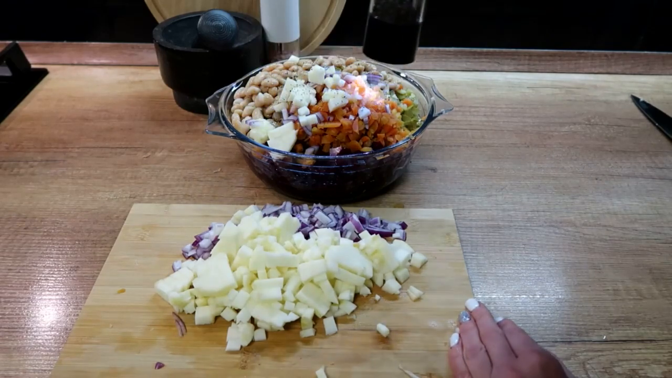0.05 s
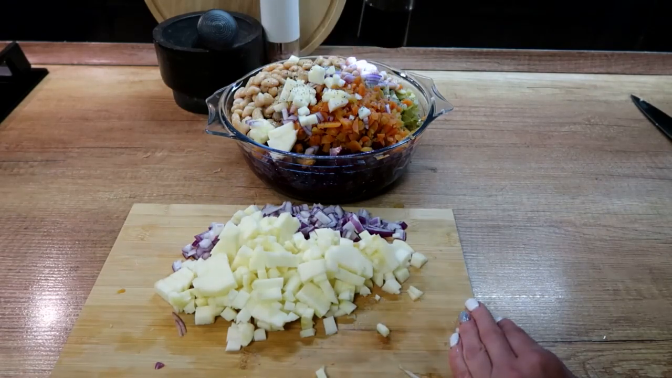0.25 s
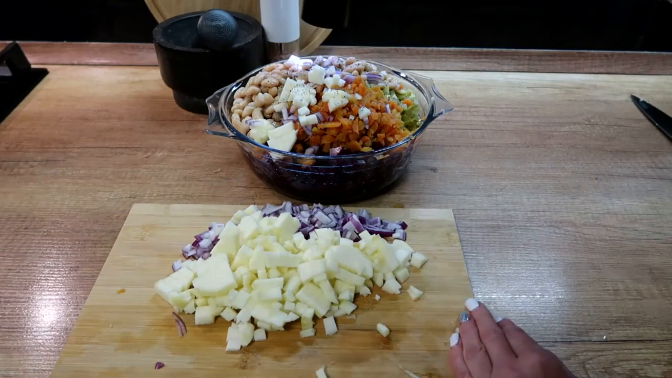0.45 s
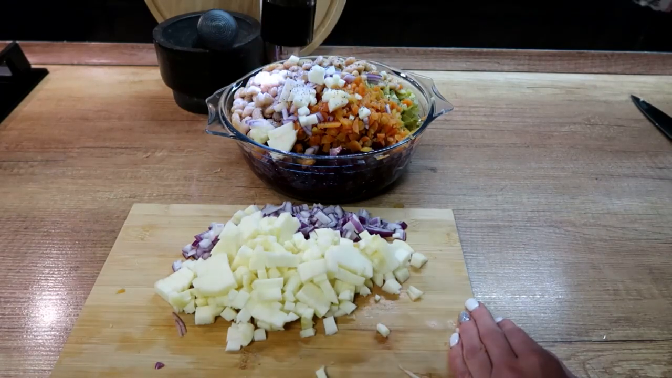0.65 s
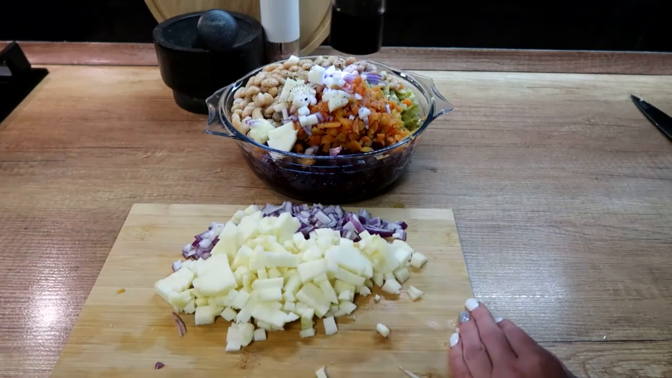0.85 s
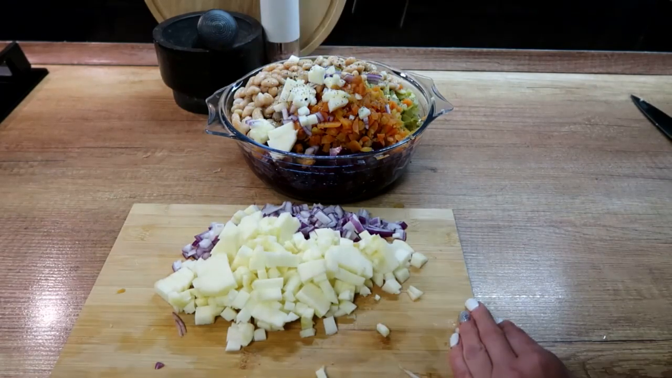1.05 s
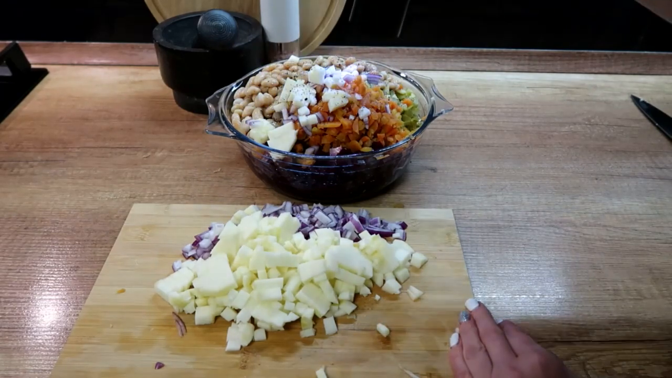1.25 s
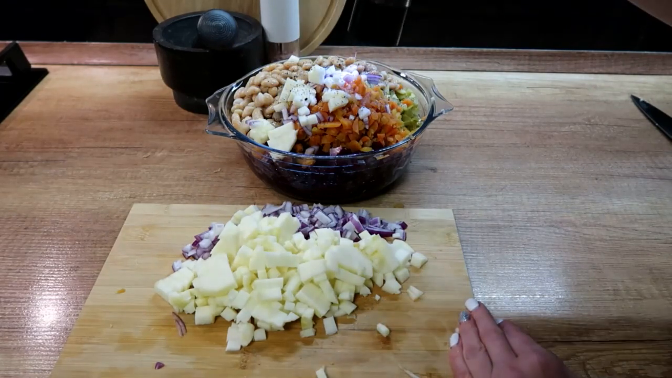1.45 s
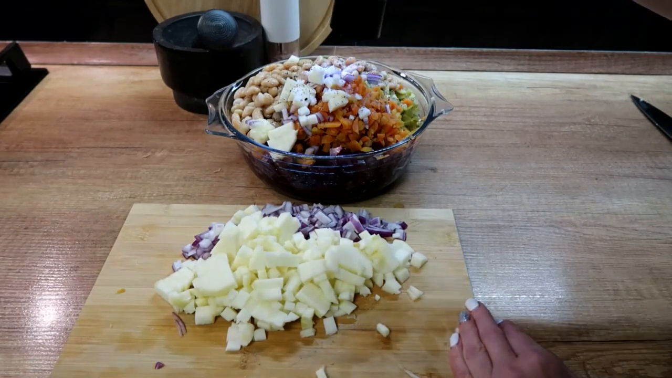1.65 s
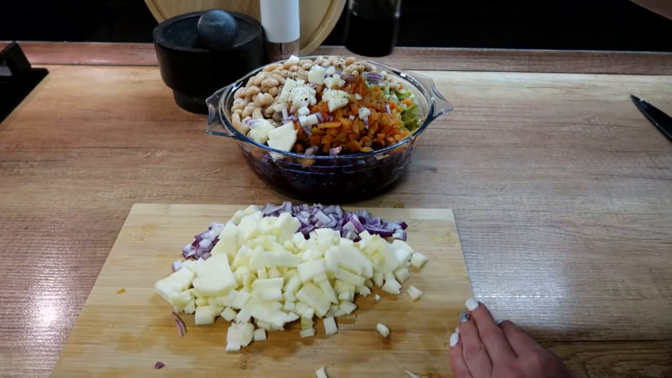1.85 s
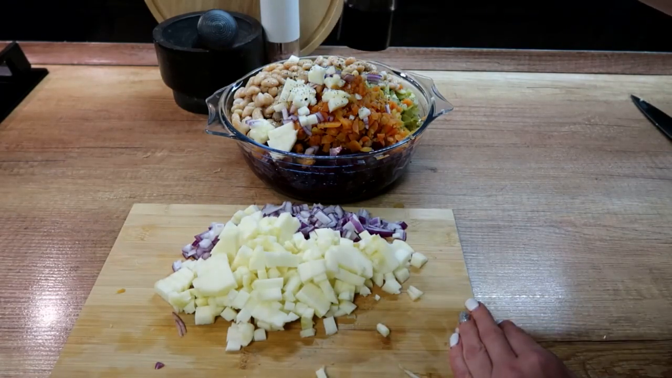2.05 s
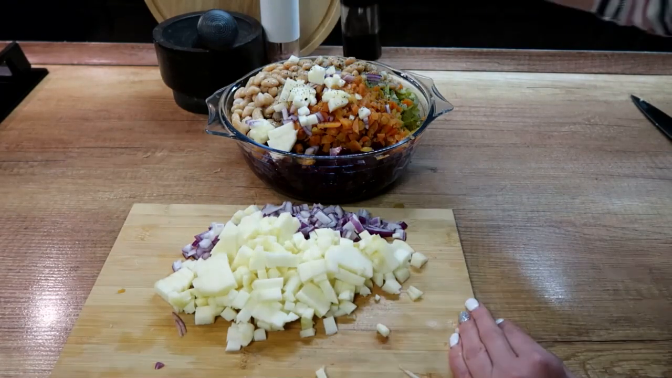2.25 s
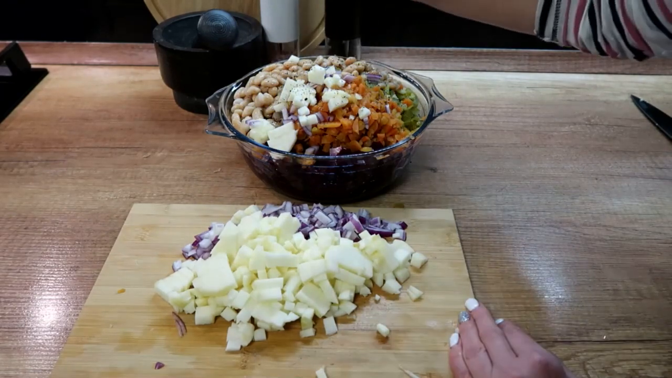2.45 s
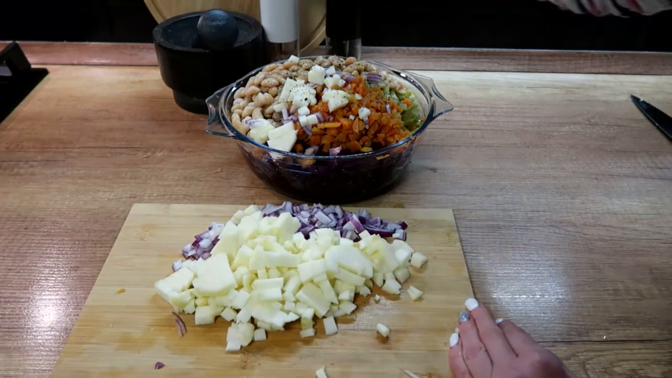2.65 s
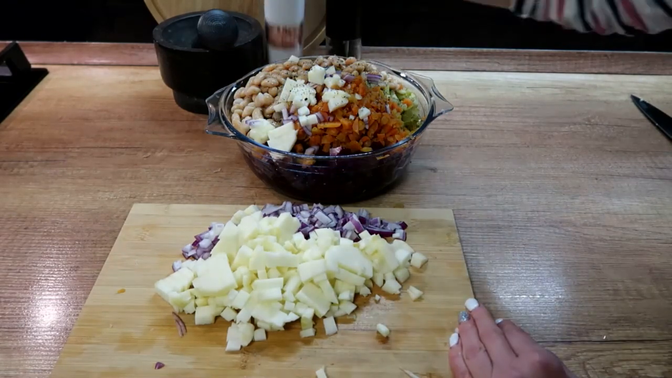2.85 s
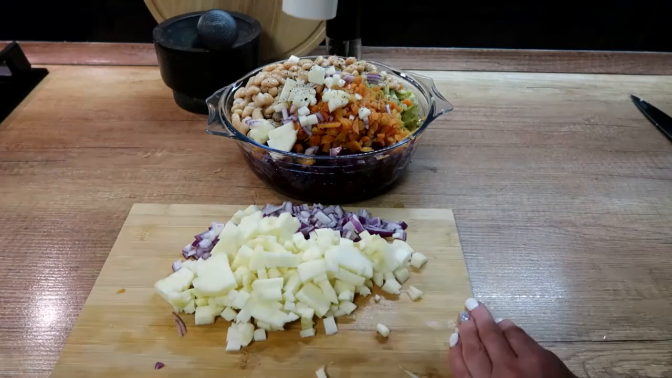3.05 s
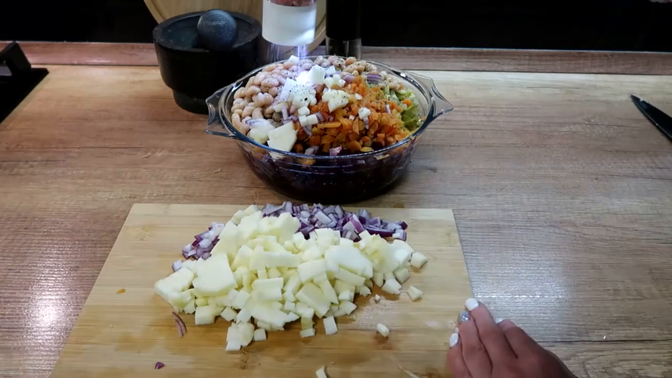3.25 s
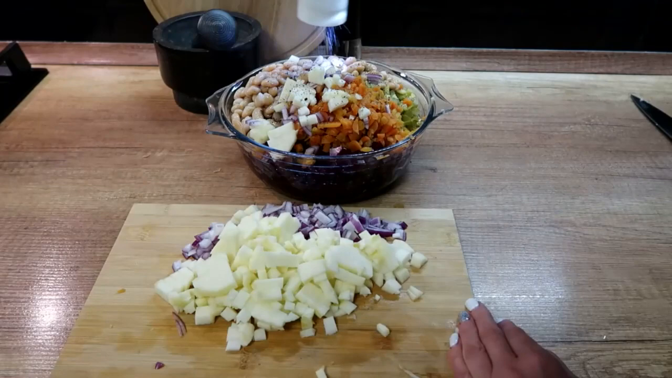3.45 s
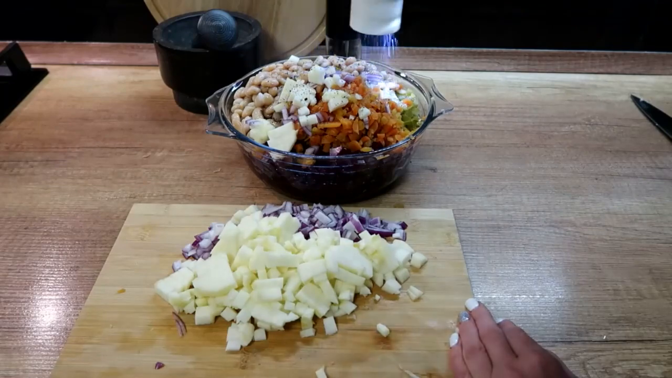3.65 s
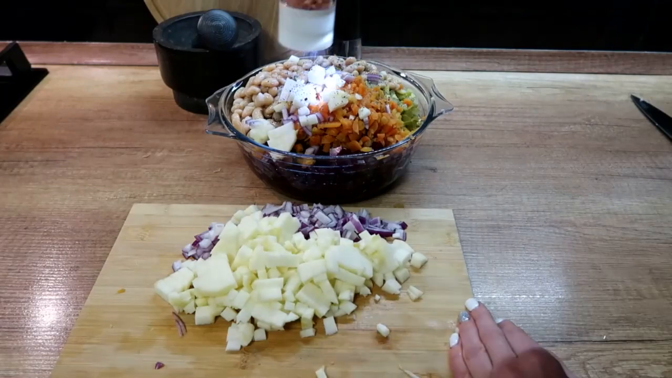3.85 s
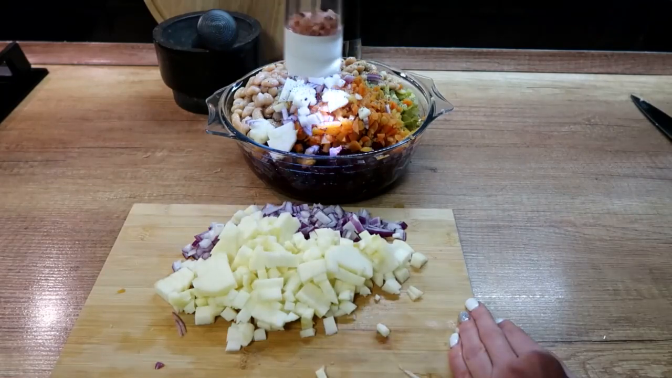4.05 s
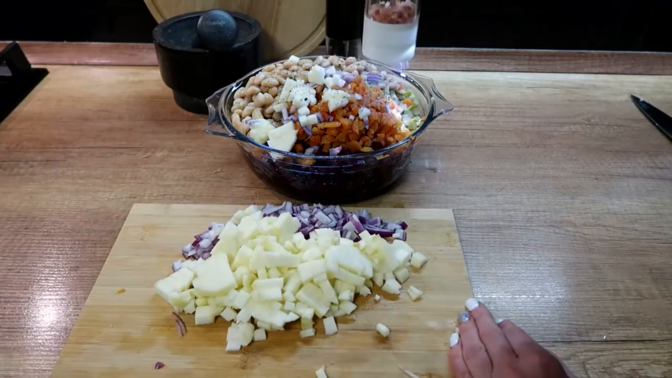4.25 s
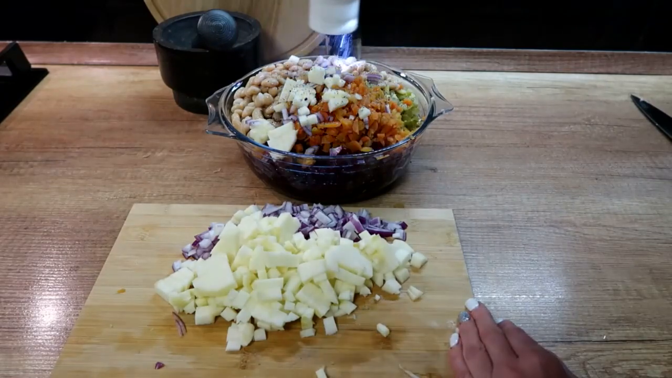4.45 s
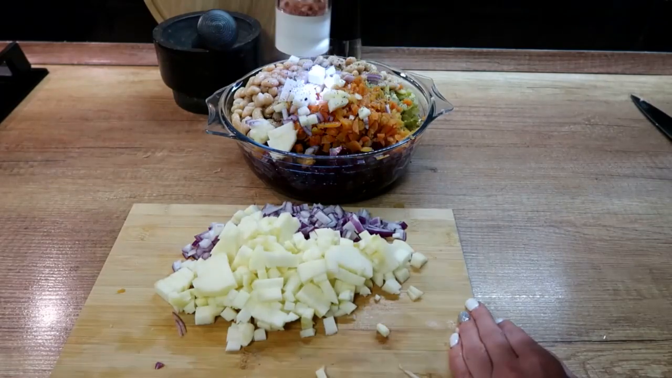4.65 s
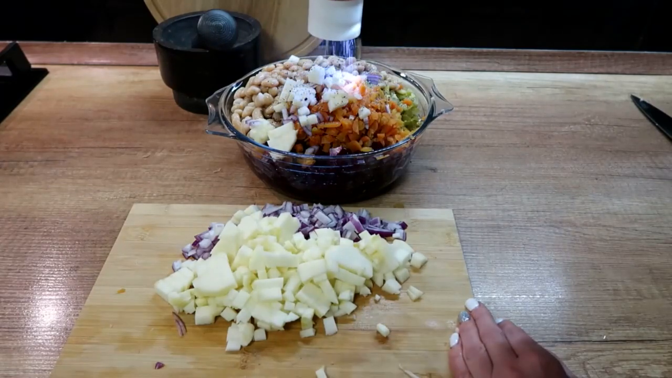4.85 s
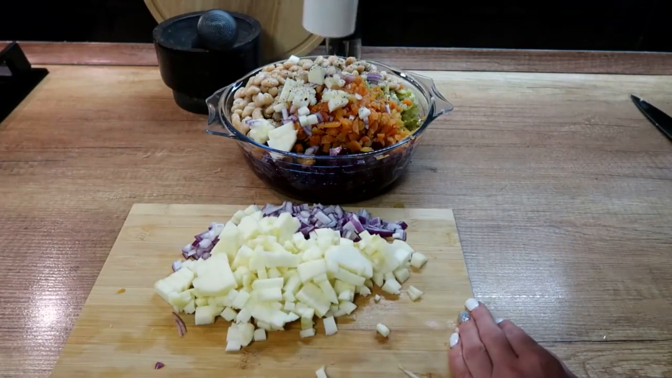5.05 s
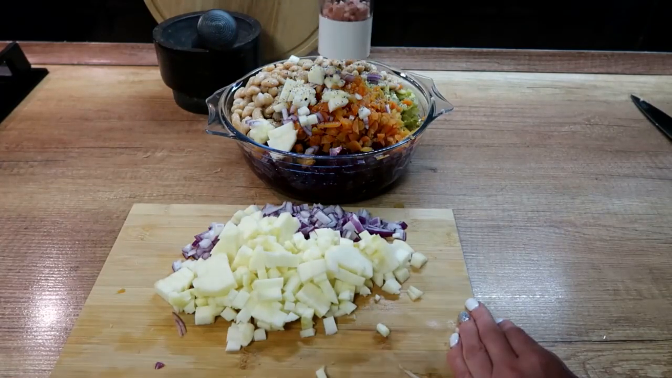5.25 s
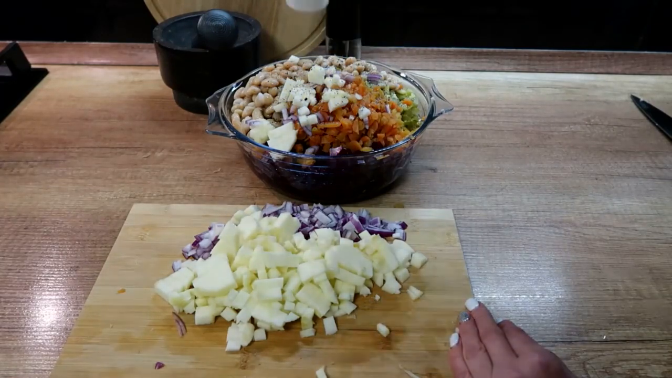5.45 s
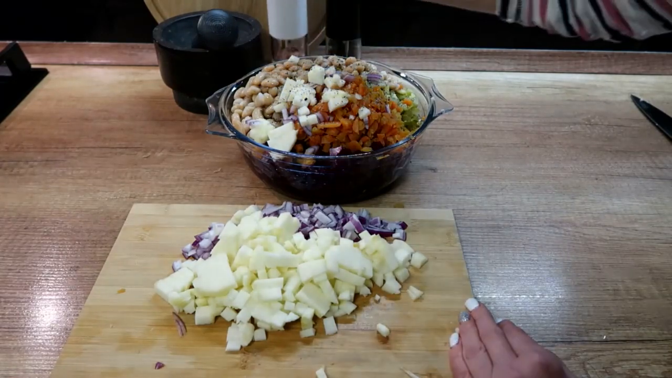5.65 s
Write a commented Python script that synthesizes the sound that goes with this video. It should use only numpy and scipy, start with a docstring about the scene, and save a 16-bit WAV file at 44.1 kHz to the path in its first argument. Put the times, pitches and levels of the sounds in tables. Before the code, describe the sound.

Close in a quiet kitchen, a motorised pepper mill is already running: bright gritty rasp, a wavering gear whine that sags and squeals, a few cracks. It cuts off abruptly, something bumps the counter with light plastic taps, and after a short quiet a salt mill spins up, coarser and duller, crackling densely until the end. Close stereo microphone, little reverberation.

```python
"""Pepper mill, then salt mill

Two battery mills are held in turn over a bowl on a kitchen counter: first pepper, then coarse salt.
As the burrs bite a grain the motor slows: the rough gear whine sags and squeals and the rasp mostly swells,
until the grain gives way and the motor picks up again. Filtered noise bursts crack over both mills.
In the pause something is put down with a dull bump: ringing counter modes, noise clatter and light taps.
"""
import sys
import numpy as np
from scipy import signal
from scipy.fft import rfft, irfft
from scipy.io import wavfile
from scipy.ndimage import uniform_filter1d, map_coordinates

SR = 44100
rng = np.random.default_rng(int(sys.argv[2]) if len(sys.argv) > 2 else 0)


def file_out(sig):
    """Save sig as 16-bit WAV at sys.argv[1]."""
    # one column per channel
    cols = np.atleast_2d(sig).T
    # limit, then scale
    lim = np.clip(cols, -1, 1)
    pcm = np.round(lim * 32767).astype(np.int16)
    wavfile.write(sys.argv[1], SR, pcm)


N = 251502   # length in samples


def from_db(db):
    """Decibels to gain."""
    return 10 ** (np.asarray(db) / 20)


def rms_one(x):
    """Scale to rms 1."""
    return x / np.sqrt(np.mean(x ** 2) + 1e-20)


def clock():
    """Time of every sample in seconds."""
    return np.arange(N) / SR


def drift(rate):
    """Smooth random wander of rms 1 that changes about rate times a second."""
    r = np.exp(-2 * np.pi * rate / SR)
    noise = rng.standard_normal(N + SR)
    return rms_one(signal.lfilter([1], [1, -2 * r, r * r], noise)[SR:])   # the first second settles


def colour(x, spectrum, unit_power=True, size=4096):
    """Causal (minimum-phase) filter that follows a table of f/Hz, level/dB."""
    hz, db = np.transpose(spectrum)
    bins_hz = np.fft.rfftfreq(size, 1 / SR)
    gain = from_db(np.interp(np.log(bins_hz + 1), np.log(hz), db))
    # folding the cepstrum forward gives minimum phase
    cepstrum = irfft(np.log(rms_one(gain) if unit_power else gain))
    cepstrum[1:size // 2] *= 2
    cepstrum[size // 2 + 1:] = 0
    response = irfft(np.exp(rfft(cepstrum)))[:size // 2]
    return signal.oaconvolve(x, response)[:N]


def resonate(x, modes):
    """Parallel resonances from a table of f/Hz, width/Hz, level/dB."""
    out = 0
    for hz, width, db in modes:
        r = np.exp(-np.pi * width / SR)
        poles = [1, -2 * r * np.cos(2 * np.pi * hz / SR), r * r]
        out = out + from_db(db) * signal.lfilter([1, 0, -1], poles, x) * (1 - r * r) / 2
    return out


def ring(clicks, hz, t60):
    """A unit click sets off a decaying sine of starting height 1."""
    r = np.exp(-np.log(1000) / (t60 * SR))
    w = 2 * np.pi * hz / SR
    return signal.lfilter([0, np.sin(w)], [1, -2 * r * np.cos(w), r * r], clicks + 1e-18)


def blows(times, db):
    """Single clicks at given times and levels."""
    out = np.zeros(N)
    samples = np.round(np.asarray(times) * SR).astype(int)
    out[np.clip(samples, 0, N - 1)] = from_db(db)
    return out


def fade(clicks, decay_s):
    """Every click starts an envelope that dies away."""
    return signal.lfilter([1], [1, -np.exp(-1 / (decay_s * SR))], clicks + 1e-18)


def even(x, size=2048):
    """Hold the short-term level at 1."""
    return x / np.sqrt(np.abs(uniform_filter1d(x ** 2, size)) + 1e-12)


# spectrum of the room air: f/Hz, level/dB (per Hz, relative)
AIR_SPECTRUM = [(25, -38.5), (60, -12.5), (130, -9.5), (300, -7), (600, -15.5), (2000, -28), (5500, -35.5),
                (10000, -44.5), (15000, -56)]
# steady hum of kitchen appliances: f/Hz, level/dB
APPLIANCE_HUM = [(140, -77), (274.5, -97.5), (13010, -92.5)]
AIR_DB = -62


def background():
    """Room air is coloured noise in mid and side; appliance hum is sines that waver in strength."""
    mid, side = (colour(noise, AIR_SPECTRUM) for noise in rng.standard_normal((2, N)))
    hum = 0
    for hz, db in APPLIANCE_HUM:
        tone = np.sqrt(2) * np.sin(2 * np.pi * hz * clock())
        hum = hum + from_db(db) * tone * (1 + 0.34 * drift(5.0))
    return hum + from_db(AIR_DB) * (mid + from_db(-5) * side * np.array([[1], [-1]]))


def grit(per_s, spread_db, crumble_s):
    """Tiny fractures of uneven size, each a very short noise burst."""
    sizes = from_db(spread_db * np.minimum(rng.exponential(1, N), 4))
    born = rng.random(N) < per_s / SR
    energy = fade(born * sizes ** 2, crumble_s)
    return rms_one(np.sqrt(energy) * rng.standard_normal(N))


def turning(x, mesh_hz, count=16):
    """The rattle partly repeats with every turn of a pinion of count teeth: faint lines follow the motor."""
    likeness = .42
    turn = count * SR / mesh_hz   # samples
    repeats = 0
    for k in range(1, 3):
        repeats = repeats + likeness ** k * map_coordinates(x, [np.arange(N) - k * turn], order=3)
    return x + repeats


def rough_tone(hz, jitter, flutter):
    """A tone that wanders in pitch and flutters in strength, both as fractions."""
    phase = 2 * np.pi * np.cumsum(hz * (1 + jitter * drift(118.0))) / SR
    return (1 + flutter * drift(92)) * np.sin(phase)


def whine(mesh_hz, partials, jitter, flutter):
    """Loose plastic gears: each partial wavers on its own."""
    return sum(from_db(db) * rough_tone(multiple * mesh_hz, jitter, flutter) for multiple, db in partials)


GRIP_S, LET_GO_S = 0.013, 0.019   # a bite takes hold and lets go
SLACK_DB, SLACK_S = 2, 0.12   # the burrs run empty for a moment after a grain has given way


def motor(bites, free_hz, idle_whine_db, idle_rasp_db, recover_s, size=32):
    """Bites drag the motor down until grains give: mesh f/Hz, gains of whine and two overtones, rasp dB."""
    t = clock()[::size]
    sag, rise_db, second, third, gears = 0, 0, 0, 0, from_db(idle_whine_db)
    for caught, freed, slowest_hz, bend, whine_db, second_db, third_db, rasp_db in bites:
        progress = np.clip((t - caught) / (freed - caught), 0, 1)
        after = np.maximum(t - freed, 0)
        slowing = (1 - slowest_hz / free_hz) * (1 - (1 - progress) ** bend)
        sag = np.maximum(sag, slowing * np.exp(-after / recover_s))
        grip = np.clip((t - caught) / GRIP_S, 0, 1) * np.exp(-after / LET_GO_S)
        slack = np.exp(-after / SLACK_S) - np.exp(-after / LET_GO_S)
        gears = np.maximum(gears, from_db(whine_db) * grip)
        strain = grip * np.sqrt(progress)   # the overtones grow as the bite tightens
        second = second + from_db(second_db) * strain
        third = third + from_db(third_db) * strain
        rise_db = rise_db + rasp_db * grip - SLACK_DB * slack
    controls = (free_hz * (1 - sag), gears, second, third, idle_rasp_db + rise_db)
    return [np.interp(clock(), t, control) for control in controls]


# scrape of pepper husks on the burr: t/s, centre f/Hz, level/dB
HUSK_SCRAPE = [(.15, 4500, -54), (0.311, 4333, -39.5), (.48, 4230, -43.5), (.58, 3870, -46),
               (.72, 4140, -43), (0.881, 4100, -39.5), (1.031, 3900, -41.5), (1.11, 3400, -44),
               (1.22, 3206, -47), (1.3, 3740, -40.5), (1.37, 3600, -40), (1.48, 3266, -46),
               (1.58, 4000, -44), (1.689, 4145, -44), (1.8, 4250, -48), (1.95, 4140, -45),
               (2.3, 4355, -46.5)]
SCRAPE_WIDTH_HZ = 440


def scrape():
    """Husks dragged round the burr: a narrow band of hiss whose centre and level glide."""
    s, *columns = np.transpose(HUSK_SCRAPE)
    hz, db = (np.interp(clock(), s, column) for column in columns)
    lowpass = signal.butter(2, SCRAPE_WIDTH_HZ / 2, fs=SR, output="sos")
    a, b = signal.sosfilt(lowpass, rng.standard_normal((2, N)))
    phase = 2 * np.pi * np.cumsum(hz) / SR
    return from_db(db) * even(a * np.cos(phase) + b * np.sin(phase))   # noise moved up to the centre


# the burrs bite a peppercorn: caught t/s, gives way t/s, slowest gear mesh f/Hz, bend [no unit],
# whine level/dB, second harmonic level/dB, third harmonic level/dB, change of rasp level/dB
# bend 1 is a steady slowing; more is a grain that yields softly
PEPPERCORN_BITES = [(-.06, .03, 1791, 3, -37, -41.5, -42, 2), (.065, .12, 1690, .9, -36.5, -36, -47, 2),
                    (.27, .4, 1855, 2, -53, -60, -45, 0), (.48, .542, 1587, 1.1, -42, -45, -39, 1.5),
                    (.56, .635, 1660, 3, -43, -45.5, -51, -0.5), (.82, 1.02, 1818, 3, -44, -50, -41, 0.5),
                    (1.02, 1.26, 1570, 4, -40.5, -48, -53, 2),
                    (1.33, 1.515, 1598, 1.5, -39, -50.5, -45, 2.5),
                    (1.62, 1.73, 1820, 1.99, -40.5, -44.5, -41.5, 1),
                    (1.88, 2.02, 1784, 3, -37, -50.5, -50.5, 1), (2.08, 2.31, 1873, 2, -45.5, -61, -49, 0)]
# rasp of the burrs: f/Hz, level/dB (per Hz, relative)
PEPPER_RASP_SPECTRUM = [(200, -30), (400, -14.5), (750, -24), (1250, -11.5), (1700, -11), (2200, -7.5),
                        (3000, -0.5), (4300, -1), (5200, 1.5), (5800, 3), (6500, -3), (7500, -11.5),
                        (10000, -12.5), (13500, -16), (15000, -41.5)]
# resonances of the plastic housing: f/Hz, width/Hz, level/dB (relative)
PEPPER_HOUSING = [(1148, 11, 10.5), (1290, 154, 4), (1573, 25, 7.5), (1689, 40, 14), (1798, 50, 10),
                  (5673, 67, 4)]
# hiss of the burrs under load: f/Hz, width/Hz, level/dB (relative)
LOAD_HISS = [(6730, 470, 2)]
# partials of the gear whine: multiple of mesh f [no unit], level/dB (relative)
PEPPER_WHINE = [(1, 0), (2, -10), (3.03, -4)]
# running free, and how fast the motor recovers from a bite
PEPPER_MOTOR = dict(free_hz=1889, idle_whine_db=-52.5, idle_rasp_db=-38, recover_s=0.039)
PEPPER_LOAD_DB = 1.5   # extra rasp at full load


def pepper_mill():
    """Soft peppercorns: dense bright rasp and scrape over singing gears, dead when the button is let go."""
    mesh_hz, whine_gain, second_gain, third_gain, rasp_db = motor(PEPPERCORN_BITES, **PEPPER_MOTOR)
    load = np.clip((1900 - mesh_hz) / 280, 0, 1)   # the motor slows as the burrs fill
    fractures = grit(per_s=4900, spread_db=3.5, crumble_s=0.00088)
    rasp = colour(turning(fractures, mesh_hz), PEPPER_RASP_SPECTRUM)
    rasp = even(rasp + resonate(rasp, PEPPER_HOUSING) + load * resonate(rasp, LOAD_HISS))
    gears = even(whine(mesh_hz, PEPPER_WHINE, jitter=.006 + .008 * load, flutter=.4))
    second = second_gain * rough_tone(2 * mesh_hz, jitter=.016, flutter=.6)
    third = third_gain * rough_tone(3 * mesh_hz, jitter=.012, flutter=.6)
    running = np.clip((2.304 - clock()) / .003, 0, 1)
    loud_rasp = from_db(rasp_db + PEPPER_LOAD_DB * load) * rasp
    return running * (loud_rasp + whine_gain * gears + second + third + scrape())


# short gear squeals: start t/s, end t/s, first f/Hz, last f/Hz, level/dB
GEAR_SQUEALS = [(0.053, 0.113, 5770, 5610, -36.5), (1.038, 1.1, 5440, 4810, -40),
                (1.081, 1.26, 4625, 4602, -41), (1.335, 1.47, 4600, 4680, -44),
                (1.467, 1.514, 3250, 2700, -40), (3.626, 3.707, 5550, 4900, -41.5),
                (4.795, 4.85, 4040, 3848, -43), (5.315, 5.355, 4625, 4197, -41),
                (5.395, 5.425, 4716, 4830, -42)]


def squeals():
    """Short rough gear squeals that glide as the motor labours."""
    gain, hz, t = np.zeros(N), np.zeros(N), clock()
    for start, end, first_hz, last_hz, db in GEAR_SQUEALS:
        swell = np.clip(np.minimum(t - start, end - t) / GRIP_S, 0, 1)
        gain += from_db(db) * swell
        hz = np.where(t >= start, np.interp(t, [start, end], [first_hz, last_hz]), hz)
    return gain * rough_tone(hz, jitter=.018, flutter=.8)


# knock of the housing: multiple of the thud's f [no unit], level/dB (per Hz, relative)
HOUSING_THUD = [(.22, -26), (.5, -4), (.75, 1), (1.15, 2), (1.7, -10.5), (2.6, -1.5), (5, -34)]


def thud_spectrum(thud_hz):
    """The knock of the housing, laid around a given pitch."""
    return [(multiple * thud_hz, db) for multiple, db in HOUSING_THUD]


def burst(spectrum, decay_s, click_db, size=1024):
    """One fracture, of unit energy: a clean break amid fragments that are crushed and then settle."""
    age = np.arange(size) / SR
    rise_s, settle_s, settle_db = .0003, .006, -26
    crushed = np.exp(-age / (rise_s + decay_s)) - np.exp(-age / rise_s)
    fragments = crushed + from_db(settle_db) * np.exp(-age / settle_s)
    split = from_db(click_db) * signal.unit_impulse(size, int(rise_s * SR))
    sound = colour(split + fragments * rng.choice([-1, 1], size), spectrum)
    return sound / np.linalg.norm(sound)


PING_DB, PING_S = -2, 0.0007   # level against the snap, time to the peak


def ping(hz, size):
    """The burr rings for a few cycles: a quick swell and a quick end, envelope height 1."""
    age = np.arange(size) / SR
    swell = (age / PING_S * np.exp(1 - age / PING_S)) ** 2
    return swell * np.sin(2 * np.pi * hz * age)


# the loudest grains that break: listed t/s (crack sounds CRACK_DELAY_S later), snap level/dB,
# snap centre f/Hz, thud level/dB, thud f/Hz, splinter level/dB (levels before the trims below)
GRAIN_CRACKS = [(0.1169, -14.5, 3280, -31, 500, -44), (0.459, -28, 4267, -42.5, 383, -62),
                (0.5384, -13.5, 4070, -27, 480, -42.5), (0.625, -25.5, 3000, -44, 453, -57),
                (1.45, -23, 1660, -44.5, 381.3, -50), (1.511, -15.5, 2750, -37.5, 482.8, -57.5),
                (3.139, -15, 1680, -72, 730, -49), (3.16, -20, 3120, -58, 600, -58),
                (3.212, -11, 1900, -43, 606, -43), (3.271, -17, 2600, -37, 500, -58),
                (3.32, -18.5, 1990, -59, 600, -60), (3.397, -21, 1650, -53, 600, -62),
                (3.462, -27, 2900, -58, 500, -54), (3.5, -13.5, 1636, -29, 670, -57),
                (3.616, -19.5, 1920, -41, 595, -58), (3.718, -18.5, 1240, -30.5, 610, -58),
                (3.814, -15, 1970, -38, 600, -62), (3.851, -14.5, 2018, -32.5, 570, -58),
                (3.864, -22, 1700, -46, 600, -60), (3.983, -29, 1900, -38, 487, -60),
                (4.094, -16, 2500, -44, 600, -54), (4.119, -13, 1644, -37, 640, -53),
                (4.14, -15, 1926, -48, 493, -52), (4.181, -17.5, 1643, -56, 597, -63),
                (4.226, -15.5, 3040, -31, 556.5, -56), (4.299, -21.5, 1680, -39, 560.6, -60),
                (4.374, -12.5, 2315, -51, 427.6, -38.5), (4.408, -16, 1940, -36.5, 699, -51),
                (4.456, -24, 1884, -36, 642.5, -63), (4.572, -24, 2100, -59, 599, -54),
                (4.653, -21.5, 2830, -39, 377, -55), (4.702, -15.5, 1956, -34.5, 500, -58),
                (4.721, -15, 2414, -34, 420, -60), (4.866, -26, 3460, -39, 560, -48),
                (4.953, -14, 1900, -47, 510, -46), (5.026, -19, 1900, -39, 551.7, -60),
                (5.094, -16, 2710, -32, 480.7, -47), (5.163, -19.5, 1854, -40, 424, -47),
                (5.243, -19, 1912, -45, 521.4, -58), (5.362, -10.5, 2007, -29, 779, -36.5),
                (5.3846, -12.5, 2080, -38, 744.5, -61), (5.536, -22.5, 1980, -41, 451, -60),
                (5.567, -25, 2900, -58, 500, -60), (5.582, -14.5, 2865, -38, 529.7, -48),
                (5.662, -16.5, 1680, -36.5, 469, -63)]
# the parts of a crack: f/Hz, level/dB (per Hz, relative)
DULL_SNAP_SPECTRUM = [(400, -17), (1000, -7.5), (1700, 7.5), (2300, -1), (3200, -2), (4500, -11.5),
                      (8000, -48)]
BRIGHT_SNAP_SPECTRUM = [(800, -14.5), (1700, -2), (2300, -3), (3200, 9.5), (4300, 1.5), (6000, -6.5),
                        (8000, -43)]
SPLINTER_SPECTRUM = [(3000, -8.5), (6000, 13), (9000, 4), (13000, 7.5), (15500, -2.5)]
CRACK_DELAY_S = 0.0034   # the crack sounds this long after its listed time
DULL_HZ, BRIGHT_HZ = 1900, 3300   # snap centres between which dull blends into bright
RINGING_ABOVE_HZ = 2650


def cracks():
    """A grain gives way over about a millisecond and knocks the housing; bright cracks ring the burr."""
    out = np.zeros(N + SR)
    for s, snap_db, centre_hz, thud_db, thud_hz, splinter_db in GRAIN_CRACKS:
        bright = np.clip(np.log(centre_hz / DULL_HZ) / np.log(BRIGHT_HZ / DULL_HZ), .02, .96)
        dull = burst(DULL_SNAP_SPECTRUM, decay_s=0.0016, click_db=1)
        dull = np.sqrt(1 - bright) * from_db(snap_db + 9.5) * dull
        sharp = burst(BRIGHT_SNAP_SPECTRUM, decay_s=0.00017, click_db=4.5)
        sharp = np.sqrt(bright) * from_db(snap_db + 4.5) * sharp
        thud = from_db(thud_db + 18.5) * burst(thud_spectrum(thud_hz), decay_s=0.0014, click_db=6.0)
        splinter = from_db(splinter_db + 27) * burst(SPLINTER_SPECTRUM, decay_s=0.0016, click_db=-3)
        rings = centre_hz > RINGING_ABOVE_HZ
        ringing = rings * from_db(snap_db + PING_DB) * ping(centre_hz, size=len(dull))
        start = int((s + CRACK_DELAY_S) * SR)
        out[start:start + len(dull)] += dull + sharp + thud + splinter + ringing
    return out[:N]


# contacts as something is put down: t/s, counter level/dB, clatter level/dB, softness t/s, clatter decay t/s
CONTACTS = [(2.329, -49, -46, 0.0081, 0.023), (2.352, -48, -42.5, 0.0017, .03),
            (2.374, -37.5, -40, 0.001, .014), (2.4029, -43, -51, 0.002, 0.073),
            (2.475, -48.5, -49.5, 0.0004, 0.02)]
# modes of the counter: f/Hz, level/dB (relative), t60/s
COUNTER_MODES = [(97, -13, 0.53), (123.8, -6, .06), (139.6, -12, 0.41), (165, -10, 0.38),
                 (200.5, 0.5, 0.26), (407, -24, 0.15), (575, -22, 0.14), (655, -24, .22), (795, -21, 0.31),
                 (850, -17, 0.19)]
# spectrum of the clatter: f/Hz, level/dB (per Hz, relative)
CLATTER_SPECTRUM = [(40, -25), (120, -1), (300, -16), (550, -2), (800, -10), (1050, -22.5), (2000, -20.5),
                    (4000, -30.5), (14000, -46.5)]
# light plastic taps: t/s, level/dB, f/Hz, t60/s
PLASTIC_TAPS = [(2.371, -45, 2130, .03), (2.54, -45.5, 2060, 0.02), (3.028, -61.5, 1960, 0.03)]


def putting_down():
    """A few soft contacts set the counter booming, with a dull clatter and light taps."""
    s, counter_db, clatter_db, softness, decays = np.transpose(CONTACTS)
    pushes = blows(s, counter_db)
    boom = sum(from_db(db) * ring(pushes, hz, t60) for hz, db, t60 in COUNTER_MODES)
    # high-pass keeps the boom free of offset and rumble below its modes
    boom = signal.sosfilt(signal.butter(4, 85, "high", fs=SR, output="sos"), boom)
    envelope = 0
    for start, db, soft_s, decay_s in zip(s, clatter_db, softness, decays):
        age = np.maximum(clock() - start, 0)
        envelope = envelope + from_db(db) * (1 - np.exp(-age / soft_s)) * np.exp(-age / decay_s)
    clatter = colour(envelope * rng.standard_normal(N), CLATTER_SPECTRUM)
    taps = sum(ring(blows(at, db), hz, t60) for at, db, hz, t60 in PLASTIC_TAPS)
    return boom + clatter + taps


# the burrs bite a salt crystal: caught t/s, gives way t/s, slowest gear mesh f/Hz (before spin-up),
# bend [no unit], whine level/dB (relative), second harmonic level/dB (relative),
# third harmonic level/dB (relative), change of rasp level/dB
CRYSTAL_BITES = [(3.1, 3.213, 1514, .8, -43.5, -39.5, -41.5, -1.5),
                 (3.21, 3.29, 1721, 4.1, -43, -45.5, -57, 0),
                 (3.4, 3.505, 1724, 1.27, -39.5, -49.5, -46, 2),
                 (3.545, 3.62, 1932, 1.93, -42.5, -60, -58, 1), (3.62, 3.715, 1690, 2.97, -42, -47, -51, 2),
                 (3.8, 3.865, 1908, 1.44, -37.5, -66, -52, 4.5),
                 (3.895, 3.985, 1914, 1.04, -36, -50, -50, 1),
                 (3.97, 4.115, 1769, 0.98, -39.5, -42, -53, 2.5),
                 (4.14, 4.235, 1680, 1.01, -38, -44, -44, 3.5),
                 (4.37, 4.46, 1866, 3.15, -37, -65, -52, 1.5),
                 (4.51, 4.63, 1890, 3, -41.5, -54, -45.5, 1.5), (4.66, 4.73, 1910, 2.5, -39.5, -60, -58, 1),
                 (4.8, 4.957, 1734, 1.5, -40, -48.5, -41, 2), (5.03, 5.1, 1709, 0.98, -51, -49, -45, 2.5),
                 (5.15, 5.25, 1891, 2.22, -45, -56, -49, 1.5),
                 (5.27, 5.365, 1348, 1.08, -41, -40, -42.5, 2),
                 (5.51, 5.62, 1685, 1.17, -45, -41.5, -45, -1.5),
                 (5.65, 5.72, 1680, 2.8, -37.5, -64, -60, -1.5)]
# rasp of the burrs: f/Hz, level/dB (per Hz, relative)
SALT_RASP_SPECTRUM = [(150, -21.5), (330, -14.5), (700, -10.5), (1300, -2.5), (1700, 0.5), (2200, 0),
                      (3400, 1), (4500, -6.5), (5700, -2.5), (6800, -16), (9700, -17), (11000, -20),
                      (12500, -13), (15000, -38)]
# resonances of the plastic housing: f/Hz, width/Hz, level/dB (relative)
SALT_HOUSING = [(512, 18, 21), (542.7, 11, 14), (1667, 60, 6.5), (1898, 80, 2.5), (3510, 44, 2),
                (7370, 830, 4.5), (9430, 1200, 1.5)]
# spectrum of breaking chips: f/Hz, level/dB (per Hz, relative)
CHIP_SPECTRUM = [(400, -21), (1000, 0), (1600, 1.5), (2200, 2), (3000, 3.5), (4500, -8.5), (6000, -3),
                 (8000, -29)]
# partials of the gear whine: multiple of mesh f [no unit], level/dB (relative)
SALT_WHINE = [(0.862, -12), (1, 5), (3, -1)]
# resonances that lift the whine: f/Hz, width/Hz, level/dB (relative)
WHINE_RESONANCES = [(1940, 94, 4), (3560, 290, 4)]
# running free, and how fast the motor recovers from a bite; the whine is halved in the mix
SALT_MOTOR = dict(free_hz=2022, idle_whine_db=-47.5, idle_rasp_db=-38.5, recover_s=.04)
SALT_START_S, SPIN_UP_S = 3.066, .042   # the mill is switched on and labours up to speed
CRUMB_HZ, CRUMB_DB, CHIP_DB = 452, -22.5, -7.5   # crumbs and chips that break all the time, against the rasp


def salt_mill():
    """Hard crystals: spin-up into coarse dull grit and crackle; the whine flares at housing resonances."""
    mesh_hz, whine_gain, second_gain, third_gain, rasp_db = motor(CRYSTAL_BITES, **SALT_MOTOR)
    spin = 1 - np.exp(-np.maximum(clock() - SALT_START_S, .01) / SPIN_UP_S)
    mesh_hz = mesh_hz * spin
    fractures = grit(per_s=2000, spread_db=0.5, crumble_s=0.00064)
    rasp = colour(turning(fractures, mesh_hz), SALT_RASP_SPECTRUM)
    rasp = even(rasp + resonate(rasp, SALT_HOUSING)) * from_db(1.4 * drift(13.0))
    crumbs = grit(per_s=84, spread_db=4.0, crumble_s=0.002)
    crumbs = from_db(CRUMB_DB) * colour(crumbs, thud_spectrum(CRUMB_HZ))
    chips = grit(per_s=130, spread_db=2.2, crumble_s=0.0006)
    crackle = from_db(CHIP_DB) * colour(chips, CHIP_SPECTRUM)
    gears = even(whine(mesh_hz, SALT_WHINE, jitter=.005, flutter=.35))
    second = second_gain * rough_tone(2 * mesh_hz, jitter=.012, flutter=.6)
    third = third_gain * rough_tone(3 * mesh_hz, jitter=.012, flutter=.7)
    tones = .5 * spin * whine_gain * gears + second + third
    running = np.clip((clock() - 3.07) / 0.045, 0, 1) ** 1.5
    grinding = from_db(rasp_db) * (rasp + crumbs + crackle)
    return running * (grinding + tones + resonate(tones, WHINE_RESONANCES))


def reflections(x, count=5):
    """Echoes off bowl, counter and wall; their paths change as the mill is waved about."""
    t, out = clock(), 0
    for k, path_s in enumerate(np.geomspace(.0011, .007, count)):
        delay_s = path_s + 0.0001927 * drift(0.96)
        out = out + (-1) ** k * map_coordinates(x, [(t - delay_s) * SR], order=3)
    return out / np.sqrt(count)


def echoes(x, t60, first_s):
    """Diffuse reflections: decaying noise of unit energy as the room's response."""
    t = np.arange(SR // 2) / SR
    response = rng.standard_normal(len(t)) * np.exp(-np.log(1000) * t / t60) * (t > first_s)
    return signal.oaconvolve(x, response / np.linalg.norm(response))[:N]


# stereo width of the reflections: f/Hz, side filter level/dB
SIDE_WIDTH = [(150, -43), (1000, -20.5), (2400, -15.5), (4500, -11), (8000, -4.5), (15000, 0.5)]


def kitchen(x):
    """Near reflections differ between the microphones; the room adds a faint tail."""
    mid = x + from_db(-6.0) * reflections(x) + from_db(-30.5) * echoes(x, t60=0.34, first_s=0.0092)
    side = reflections(x) + from_db(1.5) * echoes(x, t60=0.016, first_s=0.002)
    side = colour(side, SIDE_WIDTH, unit_power=False)
    return np.array([mid + side, mid - side])


def scene():
    """The mills work a little right of centre."""
    sources = pepper_mill() + squeals() + cracks() + putting_down() + salt_mill()
    return kitchen(sources) * from_db([[-.3], [.3]]) + background()


CUTOFF_HZ = 15300


def record(dry):
    """The top is cut steeply."""
    return signal.sosfilt(signal.ellip(12, .1, 90, CUTOFF_HZ, fs=SR, output="sos"), dry)


dry = scene()
out = record(dry)
file_out(out)
```